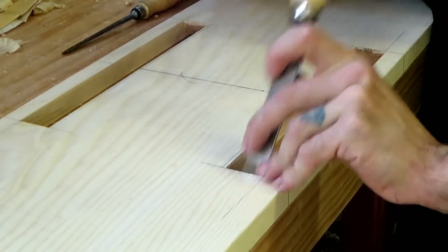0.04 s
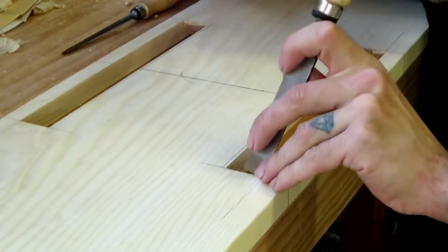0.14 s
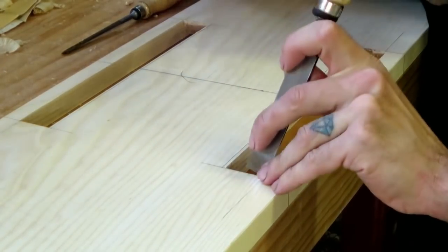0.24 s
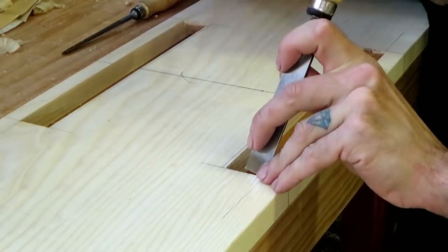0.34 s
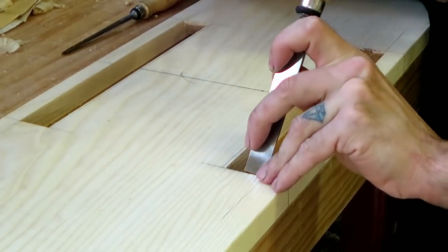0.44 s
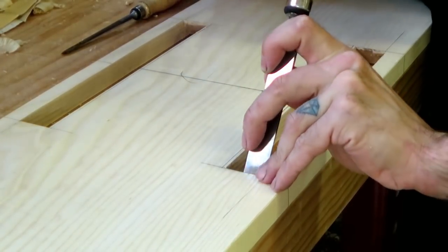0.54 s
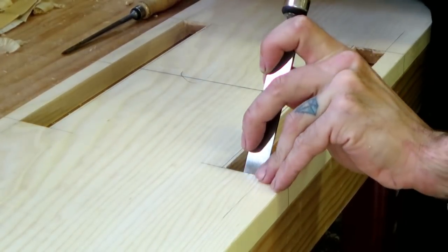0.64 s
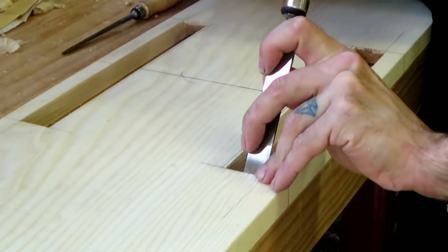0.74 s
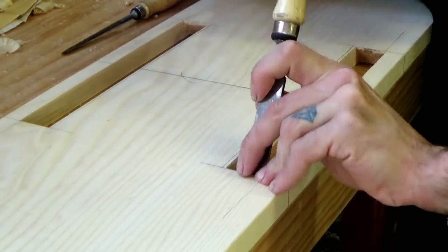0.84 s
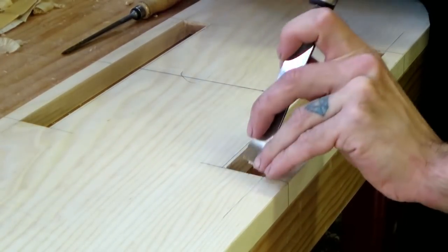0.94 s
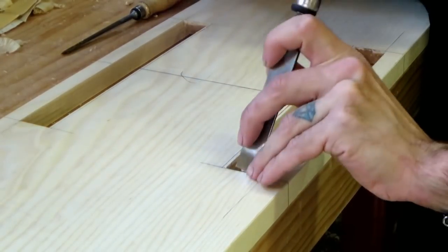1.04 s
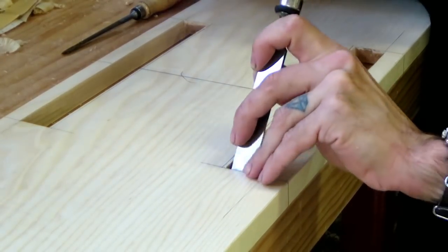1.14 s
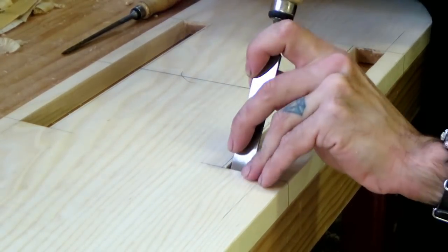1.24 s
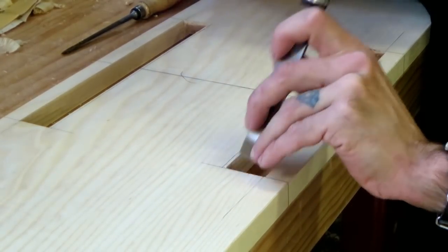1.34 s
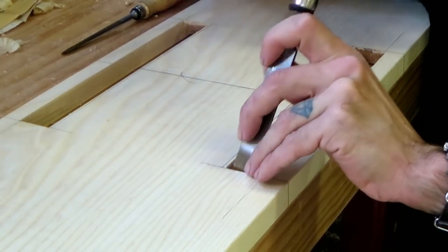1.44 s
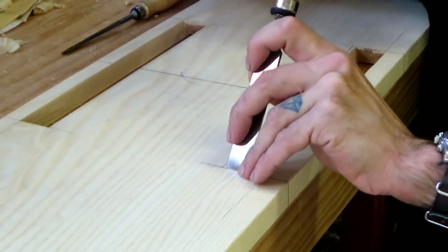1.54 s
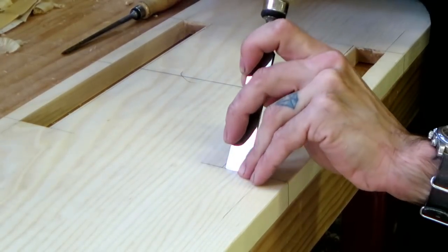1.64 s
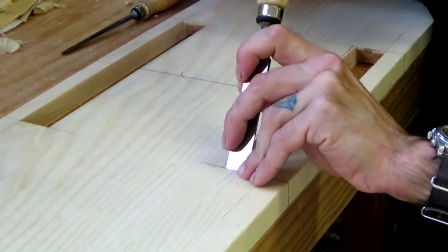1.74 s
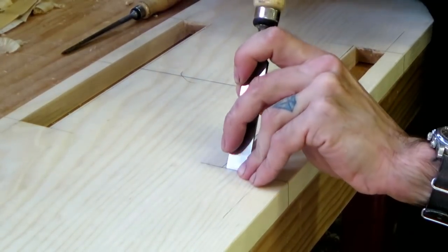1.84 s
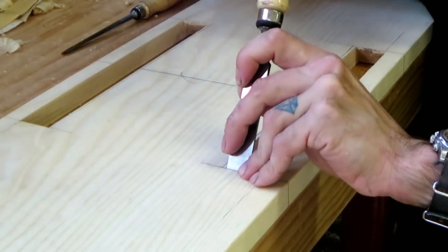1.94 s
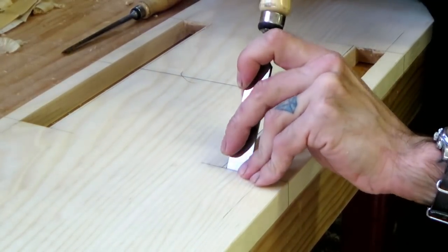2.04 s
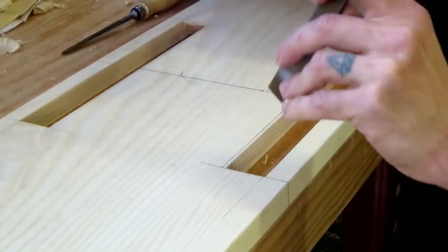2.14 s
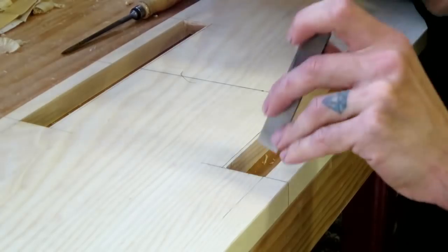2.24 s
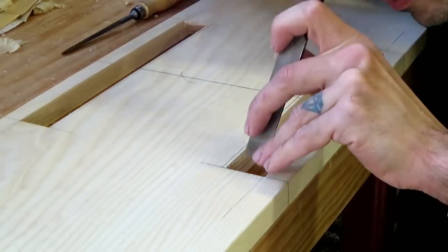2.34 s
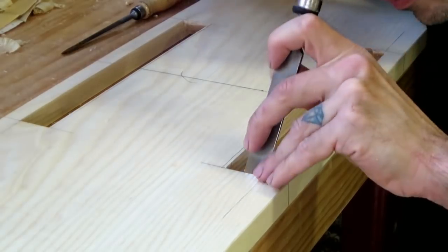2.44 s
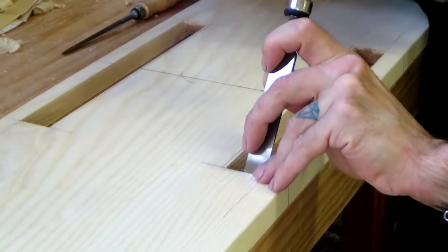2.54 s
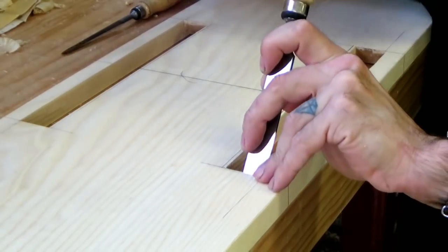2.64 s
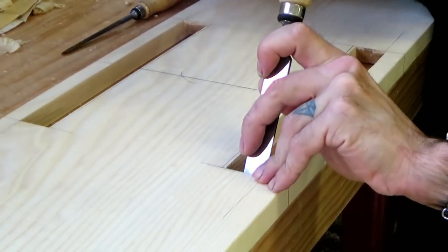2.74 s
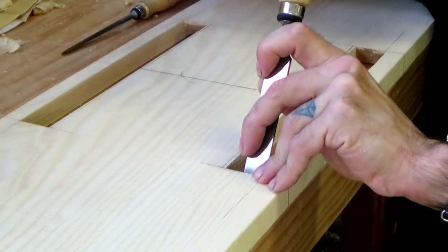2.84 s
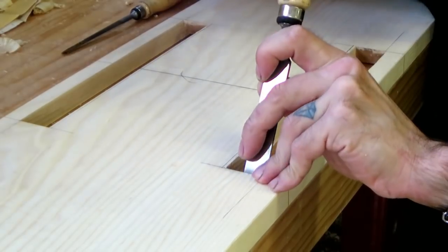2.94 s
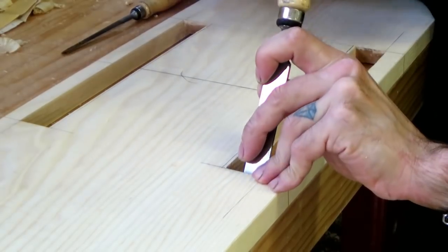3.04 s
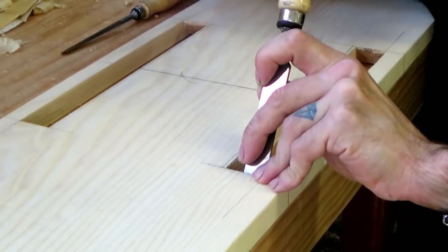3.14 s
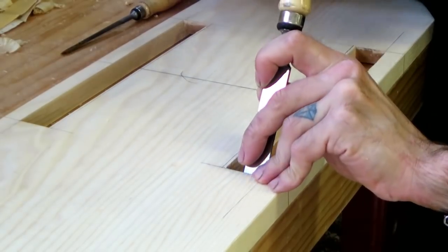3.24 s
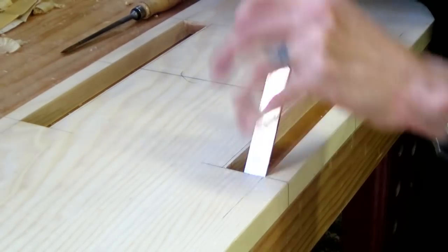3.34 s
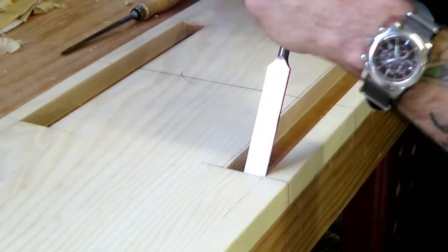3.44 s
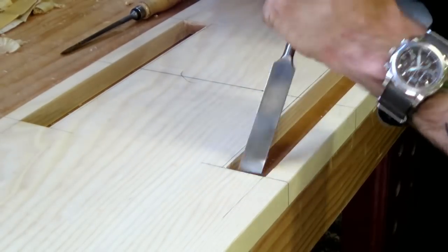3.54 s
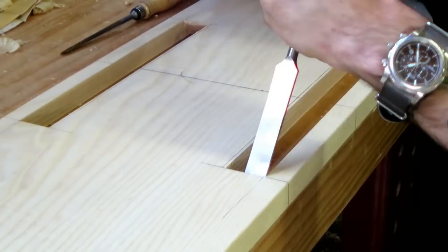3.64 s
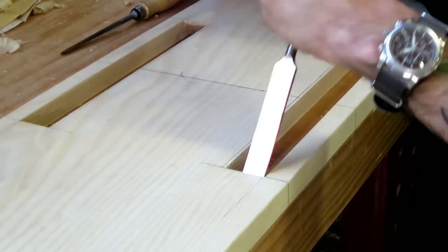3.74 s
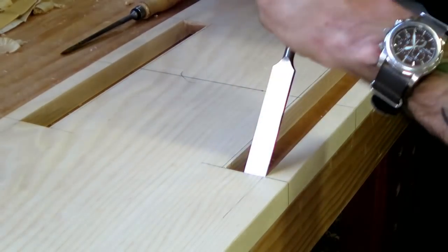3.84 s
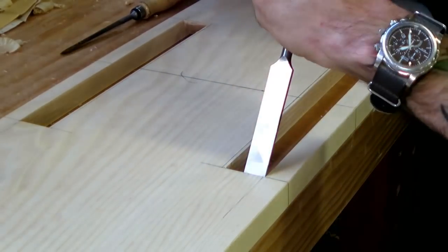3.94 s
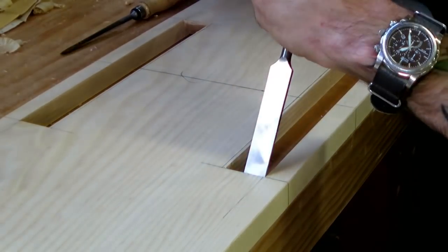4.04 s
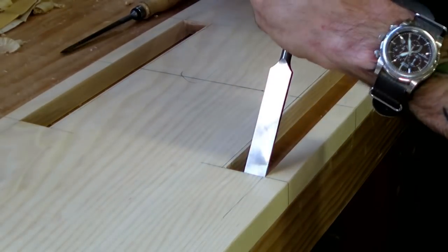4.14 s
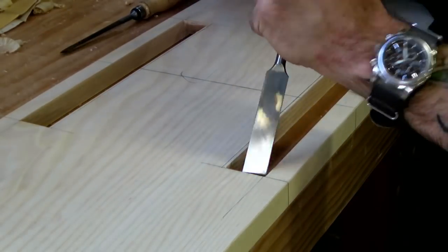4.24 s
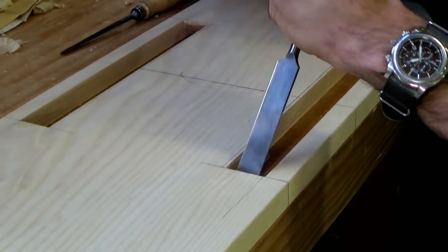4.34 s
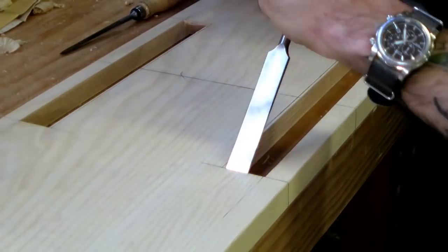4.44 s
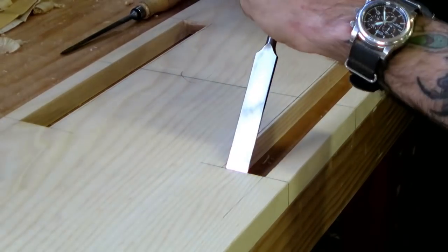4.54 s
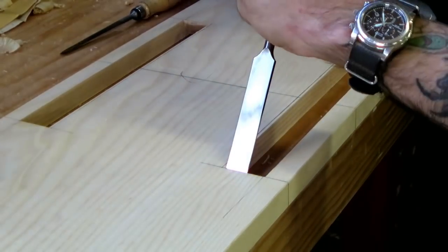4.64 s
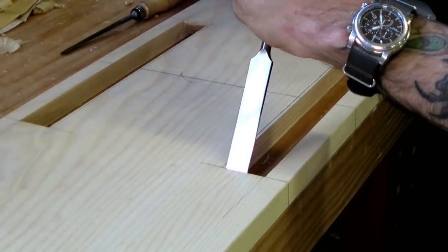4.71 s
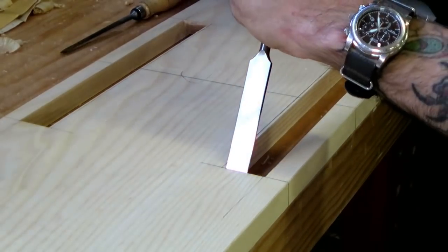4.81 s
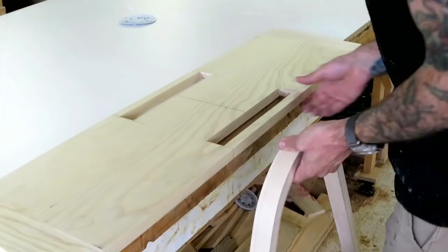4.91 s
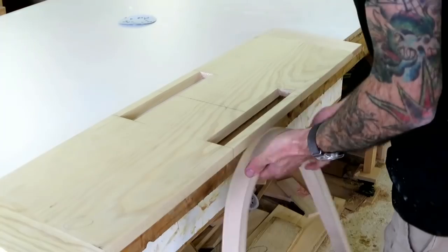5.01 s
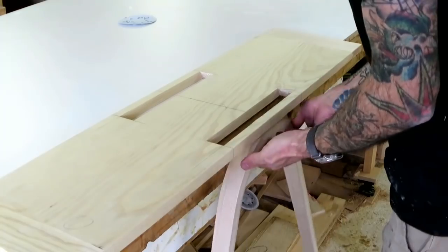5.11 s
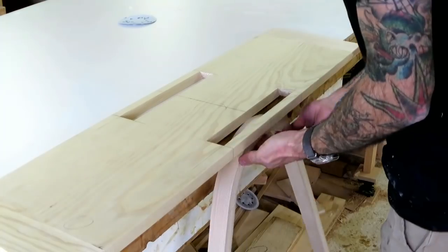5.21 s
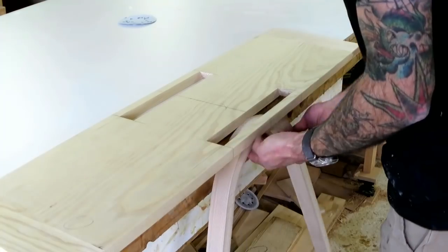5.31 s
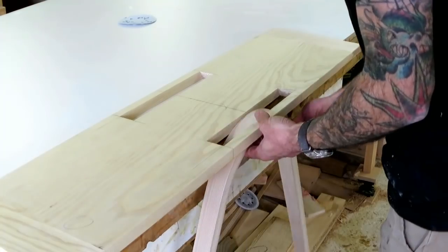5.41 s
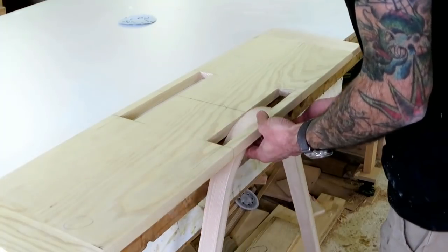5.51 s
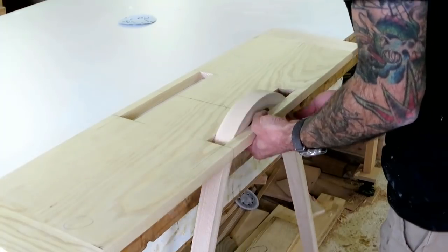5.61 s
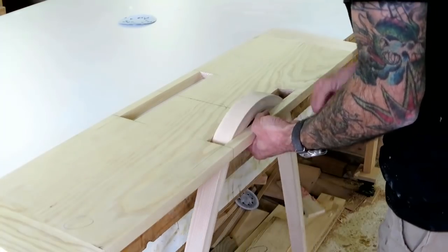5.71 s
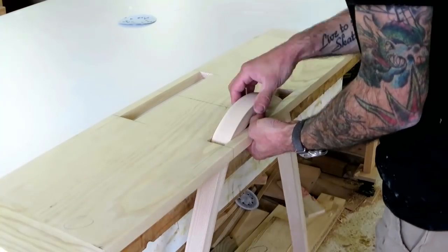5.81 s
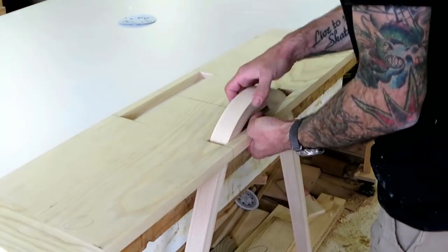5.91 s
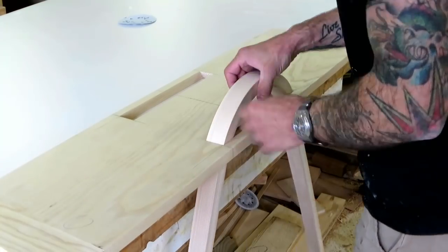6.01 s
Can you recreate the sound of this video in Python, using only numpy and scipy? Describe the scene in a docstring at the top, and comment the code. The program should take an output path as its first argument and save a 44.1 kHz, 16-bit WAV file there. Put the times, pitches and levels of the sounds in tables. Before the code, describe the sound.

A chisel chops wood in fast, choppy bursts of clicks and knocks, as if sped up, then wood rubs softly on wood.

```python
"""Quick clusters of chisel blows on a softwood board in a quiet workshop, faster than life.
Each blow is a crack, the board's ring, a bench boom and the shop's echo. Only short slices of it
are kept and butted together, so many blows start in mid-ring and all die in steps.
Room tone with a faint whine sinks after each cluster and climbs back.
At the end a wooden rail rubs through the slot."""
import sys
import numpy as np
from scipy import signal
from scipy.fft import rfft, irfft
from scipy.io import wavfile
from scipy.ndimage import map_coordinates

SR = 44100
rng = np.random.default_rng(int(sys.argv[2]) if len(sys.argv) > 2 else 0)


def log_audio(samples):
    """Write samples as a 16-bit WAV file to the path given in sys.argv[1]."""
    # one column per channel
    frames = np.atleast_2d(samples).T
    # limit to full scale, then quantise
    limited = np.clip(frames, -1, 1)
    pcm = np.round(limited * 32767).astype(np.int16)
    wavfile.write(sys.argv[1], SR, pcm)


N = 267510

# board resonances: f/Hz, half-width/Hz, level/dB
BOARD_MODES = [(112.9, 55, -3), (277.6, 18.6, 4), (475, 160, -3.5), (905, 53, 0.5), (1122, 63, -1),
               (1400, 80, -8), (2120, 130, -12.5), (2640, 640, -18), (5800, 290, -22), (8120, 260, -21)]
SLICE_S, FADE_S, FIRST_JOIN_S = 0.03419, 0.0046, 0.0014
FRESH_MS = 5  # a younger blow gets no fade-in


def amp(db):
    """Gain of a level in dB."""
    return 10 ** (np.asarray(db) / 20)


def along(points, hz):
    """Interpolates (f/Hz, value) points over log frequency."""
    freqs, values = np.transpose(points)
    return np.interp(np.log(hz + 1), np.log(freqs + 1), values)


def wobble(rate_hz):
    """Smooth random curve through Gaussian knots."""
    knots = rng.standard_normal(int(N * rate_hz / SR) + 4)
    return map_coordinates(knots, [np.arange(N) * rate_hz / SR])


def noise(size, gain, correlation):
    """Stereo noise of rms 1; gain and L/R correlation vary with frequency."""
    hz = np.fft.rfftfreq(size, 1 / SR)
    angle = np.arccos(np.clip(along(correlation, hz), -1, 1)) / 2
    spectrum = rfft(rng.standard_normal((2, size))) * gain(hz)
    mid, side = irfft(spectrum * [np.cos(angle), np.sin(angle)], size)
    stereo = np.array([mid + side, mid - side])
    return stereo / np.sqrt(np.mean(stereo ** 2) + 1e-20)


def board_gain(hz):
    """Resonances add in power; wood absorbs the top treble."""
    power = sum(amp(2 * db) / (1 + ((hz - mode_hz ** 2 / (hz + 1)) / width_hz) ** 2)
                for mode_hz, width_hz, db in BOARD_MODES)
    return np.sqrt(power) / (1 + (hz / 11000) ** 4)


def blow(thud_db, treble_db, notes_hz, note_db):
    """One blow at natural speed: crack, ring, boom, echo. The struck spot favours two notes."""
    # spectra of crack and shop echo: f/Hz, level/dB
    crack_db = [(100, -14), (400, 1), (1000, 1), (2200, -3), (3200, -5), (4500, -11.5), (8000, -19),
                (12000, -23.5), (16000, -53)]
    echo_db = [(18, -30), (30, -13.5), (328, -5), (780, -9), (1810, -10), (2010, -15), (2480, -14),
               (8300, -33), (16000, -39)]
    # shop decay: f/Hz, T60/s
    shop_t60_s = [(100, 0.69), (1000, 0.64), (5000, 0.54), (13000, 0.27)]
    # stereo image of the crack and of ring and echo: f/Hz, L/R correlation
    crack_corr = [(500, 0.82), (3000, 0.83), (8000, 0.4)]
    diffuse_corr = [(130, 1), (640, 0.8), (1400, 0.7), (3100, 0.34), (6800, 0.046)]
    size = 2 ** 15
    t = np.arange(size) / SR
    bite_db = 0.2 + 0.3 * treble_db
    tilt_db = [(130, thud_db), (230, 0), (2200, 0), (3200, bite_db), (5500, bite_db), (7000, treble_db)]

    def colour(hz, peak_db=note_db):
        peaks = sum(amp(peak_db) / (1 + ((hz / f - 1) / 0.076) ** 2) for f in notes_hz)
        return amp(along(tilt_db, hz)) * (1 + peaks)

    def decay(t60_s):
        return amp(-60 * t / t60_s)

    def rise(tau_s):
        return 1 - np.exp(-t / tau_s)

    crack = noise(size, lambda hz: colour(hz) * amp(along(crack_db, hz)), crack_corr)
    crack *= decay(0.013) + amp(-8) * decay(0.041)
    notes = sum(amp(along(tilt_db, f)) * decay(0.016 + 27.8 / f) * np.sin(2 * np.pi * f * t)
                for f in notes_hz)  # high notes die sooner
    direct = (crack + amp(note_db - 11) * notes) * (1 - np.exp(-(t / 0.001) ** 2))
    ring = noise(size, lambda hz: colour(hz) * board_gain(hz), diffuse_corr)
    ring *= amp(-11) * decay(0.19) * rise(0.001)
    wash = noise(size, lambda hz: colour(hz, note_db - 11) * amp(along(echo_db, hz)), diffuse_corr)
    bin_hz, frame_s, frames = signal.stft(wash, SR, nperseg=256)
    frames *= amp(-60 * frame_s / along(shop_t60_s, bin_hz)[:, None])
    echo = signal.istft(frames, SR, nperseg=256)[1][:, :size]
    boom_hz = BOARD_MODES[0][0] * rng.normal(1, 0.036)  # the bench's lowest note
    boom = amp(thud_db - 23) * decay(0.39) * rise(0.012) * np.sin(2 * np.pi * boom_hz * t)
    return direct + boom + ring + amp(-19) * echo * rise(0.0042)


def sliced(sound, age_ms, first_slice_s):
    """Keeps a slice, skips ahead, keeps the next; neighbours cross-fade."""
    fresh = age_ms < FRESH_MS
    first_skip_s, skip_s = (0.05 if fresh else 0.064), 0.055
    out = np.zeros((2, SR // 2))
    fade = int(FADE_S * SR)
    read_s, cursor = age_ms / 1000, 0
    for k in range(7):
        keep_s = SLICE_S if k else first_slice_s
        length = int(keep_s * SR) + fade
        ramp = np.arange(length)
        window = np.minimum(1, np.minimum(ramp, length - ramp) / fade)
        if k == 0 and fresh:
            window[:fade] = 1
        out[:, cursor:cursor + length] += window * sound[:, int(read_s * SR):][:, :length]
        read_s = read_s + keep_s + (skip_s if k else first_skip_s)
        cursor += length - fade
    return out


def chisel():
    """Sliced blows, slightly right; a fresh one's first slice ends at the next join."""
    # blows: t/s, first-slice level before pan/dB, age at entry/ms, thud/dB, treble/dB,
    # note 1 f/Hz, note 2 f/Hz, note strength/dB
    blows = [(0.0, -39, 61, -2.5, 6.5, 960, 386, 10), (0.103, -42, 59, -4.5, 3, 395, 262, -14),
             (0.7162, -31.5, 18.8, -7, -9, 830, 101, 3.5), (0.82, -39.5, 62.6, -4, 0.5, 915, 297, 7.5),
             (0.925, -42, 64, -33, 5.5, 424, 970, 8), (1.1905, -58.5, 2, -15, -4, 930, 3480, 9.5),
             (1.329, -29.5, 1.02, -2, 4.5, 1690, 820, 6), (1.4116, -27, 0.87, 4, 9, 3340, 1296, -1.5),
             (1.778, -31.5, 24.8, 14.5, 7.5, 308, 855, 15.5), (1.881, -25, 1.18, 2, -5, 3150, 1330, 1),
             (1.949, -31.5, 18.5, 6.5, -1.5, 340.4, 1073, 10), (2.031, -26, 1.1, 3, -10.5, 1130, 2300, -21),
             (2.122, -41.5, 63, 2, -3.5, 1020, 470, 6), (2.19, -59, 60, -20, 13, 8000, 11000, -3),
             (2.667, -50, 57, -23, 5, 5800, 3300, 20.5), (2.798, -22, 0.94, 0, 9, 2430, 1950, 6.5),
             (2.873, -34, 20.6, 0, 0.5, 346.6, 848, 9.5), (2.974, -44, 54, -6, -3, 1270, 955, -7),
             (3.0603, -26, 0.58, -6, -3.5, 930, 2510, 3.5), (3.1483, -29, 0.62, -4, -1.5, 2280, 900, 1.5),
             (3.247, -36, 20, 0.5, 1.5, 278, 955, -3.5), (3.35, -41.5, 58, -5.5, 4, 1144, 566, 8.5),
             (3.4235, -29, 0.79, -6, 3, 2390, 960, -9.5), (3.626, -57.5, 60, 10, 9, 402, 933, 10.5),
             (3.765, -58, 72, 14, 2, 515, 274, 25.5), (3.818, -51.5, 60, 12, 11, 283, 2250, 15.5),
             (3.897, -52, 54, 0, 0, 900, 1080, 20), (3.968, -51.5, 78, 18.5, -8, 500, 282, 32),
             (4.068, -40.5, 58, -0.5, -0.5, 1020, 372, 5.5), (4.172, -42, 56, -7, 5, 553, 1190, 3),
             (4.2719, -22.5, 0.7, -10.5, -0.5, 1023, 2750, 2),
             (4.7427, -28, 0.88, 5.5, 2.5, 2084, 1020, 10), (4.8389, -24.5, 1.25, 2, -5, 524, 2127, 3),
             (4.9267, -28.5, 0.9, -0.5, -0.5, 3010, 1954, 4), (5.196, -35.5, 24, 4, -18, 2190, 1310, 8.5),
             (5.682, -45, 19.7, 13, -7, 272, 646, 8), (6.05, -38.5, 23.2, 1, -10, 1280, 710, 16.5)]
    left_lag_samples, pan_db = 1.53, [[-0.7], [0.7]]
    left_delay = np.exp(-2j * np.pi * np.fft.rfftfreq(SR // 2) * left_lag_samples)
    out = np.zeros((2, N + SR))
    for start_s, level_db, age_ms, thud_db, treble_db, *notes_hz, note_db in blows:
        first_slice_s = (FIRST_JOIN_S - start_s) % SLICE_S if age_ms < FRESH_MS else SLICE_S
        hit = sliced(blow(thud_db, treble_db, notes_hz, note_db), age_ms, first_slice_s)
        hit[0] = irfft(rfft(hit[0]) * left_delay)
        first_slice = hit[:, :int((first_slice_s + FADE_S / 2) * SR)]
        first_rms = np.sqrt(np.mean(first_slice ** 2))
        out[:, round(start_s * SR):][:, :hit.shape[1]] += amp(level_db) * hit / first_rms
    return out[:, :N] * amp(pan_db)


def room_tone():
    """Lumpy low rumble, hiss and a faint unsteady whine, sinking and climbing together."""
    # room level: t/s, level/dB
    level_db = [(0, -66), (.22, -66.5), (.7, -58.5), (1.03, -63.5), (1.32, -58), (1.5, -56), (1.78, -53),
                (2.25, -62.5), (2.8, -54.5), (3.55, -72), (4.07, -59), (4.42, -69), (4.74, -60.5),
                (4.97, -67), (5.0, -60), (6.07, -66)]
    # rumble and hiss spectrum: f/Hz, level/dB
    air_db = [(15, -44.5), (25, -18.5), (108, -5), (270, -15.5), (335, -11), (416, -15), (531, -17.5),
              (1650, -26), (1940, -26.5), (3620, -29.5), (16000, -44.5)]
    # stereo image: f/Hz, L/R correlation
    air_corr = [(60, 0.94), (130, 0.92), (290, 0.03), (640, -0.35), (1400, 0.3), (3100, 0.4), (15000, 0)]
    whine_hz, half_width_hz = 1630, 25
    air = noise(N, lambda hz: amp(along(air_db, hz)), air_corr) * amp(wobble(rate_hz=22.81))
    whine = noise(N, lambda hz: 1 / (1 + ((hz - whine_hz) / half_width_hz) ** 2), [(1000, 0.6)])
    whine *= amp(-20.5 + 1.5 * wobble(rate_hz=6))
    envelope = amp(np.interp(np.arange(N) / SR, *np.transpose(level_db)))
    return envelope * (air + whine)


def rail():
    """Wood rubs on wood; the grip makes it uneven."""
    # friction spectrum: f/Hz, level/dB
    rub_db = [(15, -40), (25, 3), (48, -2.5), (120, 1.5), (200, -3.5), (242, 3), (405, -5), (641, -4),
              (796, -7.5), (1070, -3), (1560, -12.5), (2050, -11.5), (7310, -25), (16000, -37.5)]
    # stereo image: f/Hz, L/R correlation
    rub_corr = [(60, 1), (290, 0.77), (1400, 0.83), (3100, 0.65), (6800, 0.31), (15000, 0.018)]
    start_s, rise_s, level_db = 4.99, 0.014, -47.5
    rub = noise(N, lambda hz: amp(along(rub_db, hz)), rub_corr)
    onset = np.clip((np.arange(N) / SR - start_s) / rise_s, 0, 1)
    return rub * onset * amp(level_db + 1.15 * wobble(rate_hz=25))


def scene():
    """Sum of the sources, stereo."""
    return chisel() + room_tone() + rail()


def record(dry):
    """Soft peak limiting, then band limits."""
    ceiling, low_hz, top_hz = 0.21, 40, 16000
    hz = np.fft.rfftfreq(N, 1 / SR)
    limited = dry / (1 + np.abs(dry / ceiling) ** 6) ** (1 / 6)
    passband = (hz < top_hz) / np.sqrt(1 + (low_hz / (hz + 1)) ** 4)
    return irfft(rfft(limited) * passband, N)


dry = scene()
out = record(dry)
log_audio(out)
```